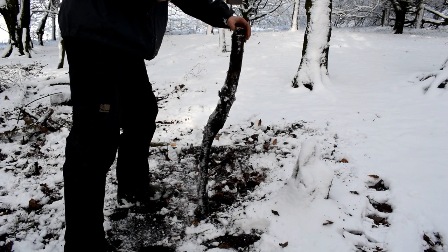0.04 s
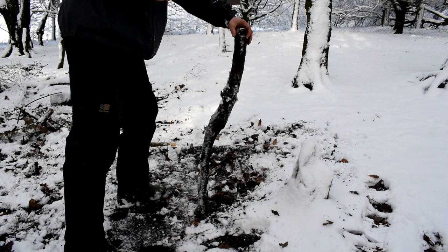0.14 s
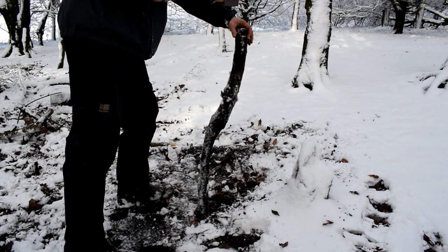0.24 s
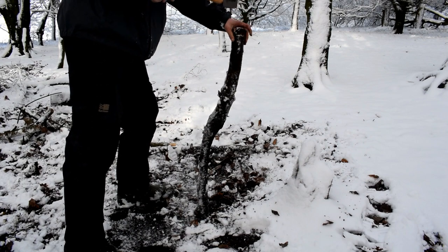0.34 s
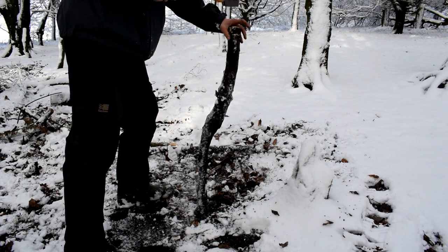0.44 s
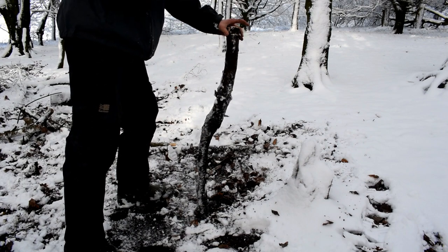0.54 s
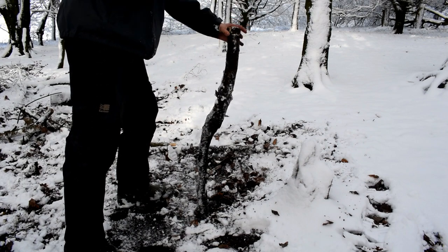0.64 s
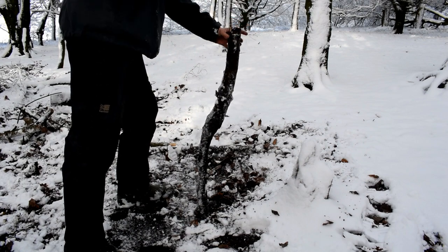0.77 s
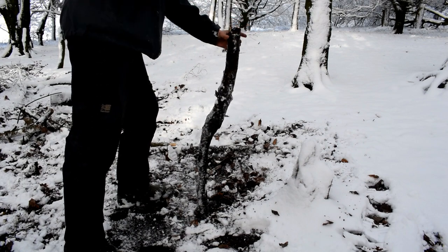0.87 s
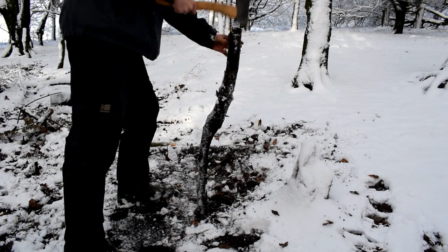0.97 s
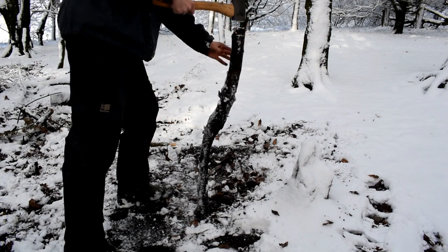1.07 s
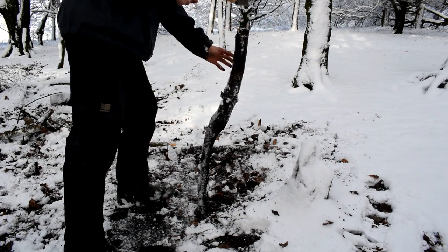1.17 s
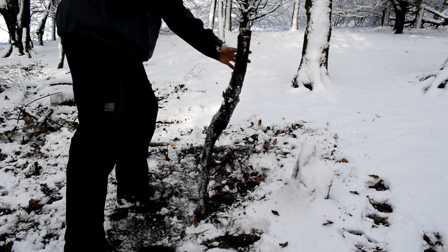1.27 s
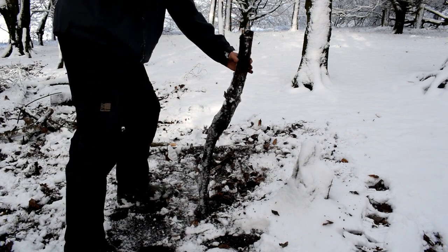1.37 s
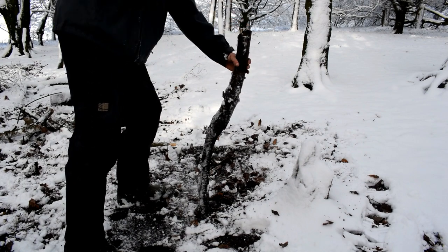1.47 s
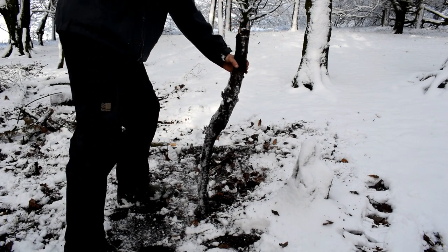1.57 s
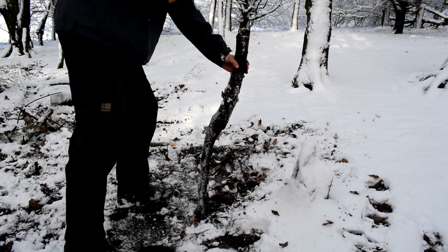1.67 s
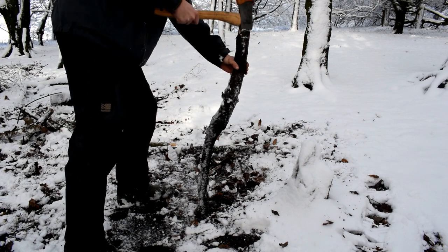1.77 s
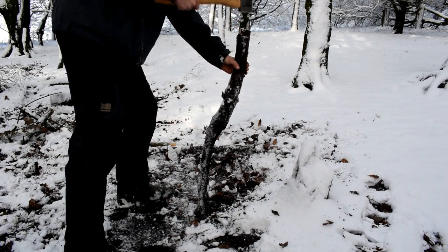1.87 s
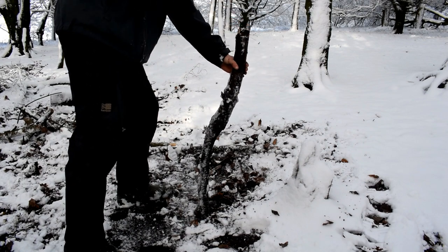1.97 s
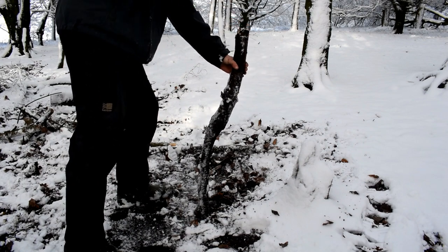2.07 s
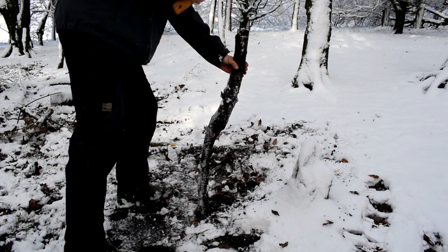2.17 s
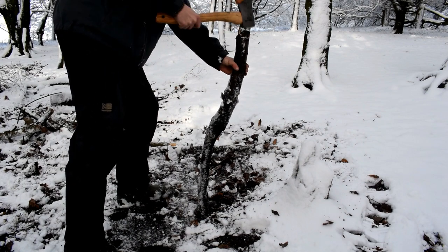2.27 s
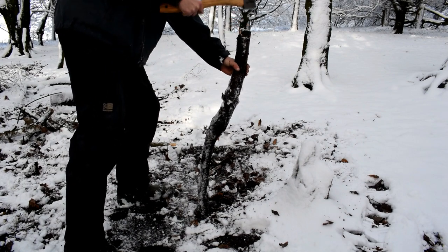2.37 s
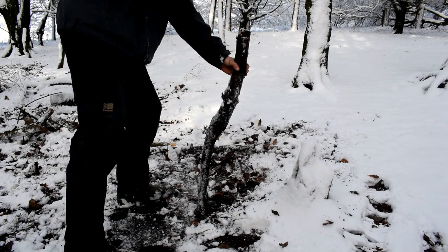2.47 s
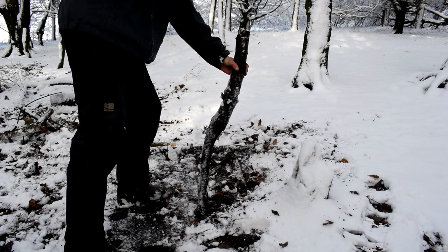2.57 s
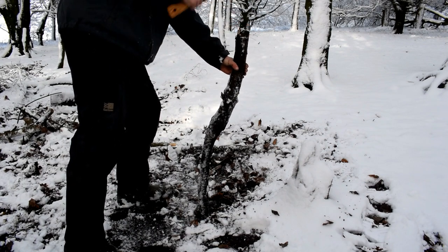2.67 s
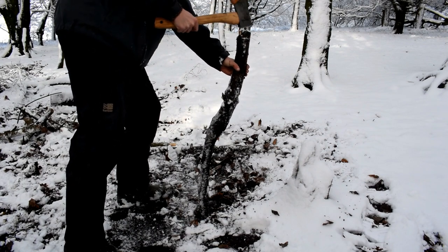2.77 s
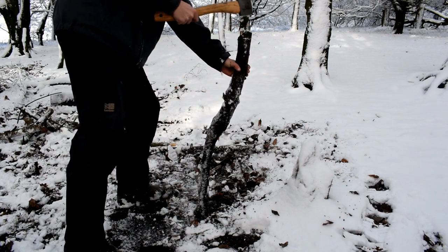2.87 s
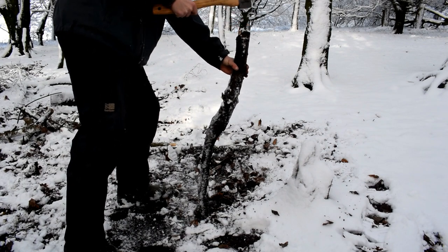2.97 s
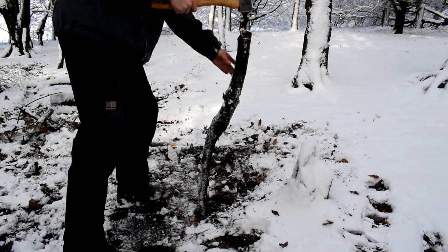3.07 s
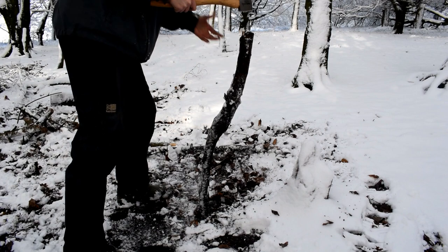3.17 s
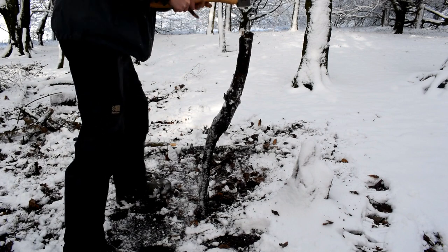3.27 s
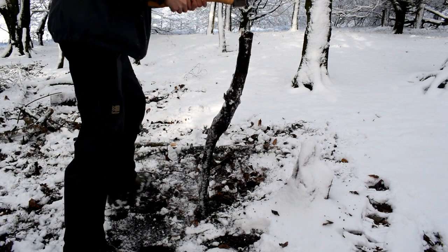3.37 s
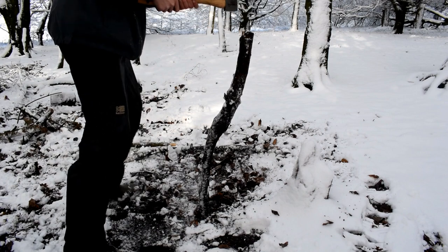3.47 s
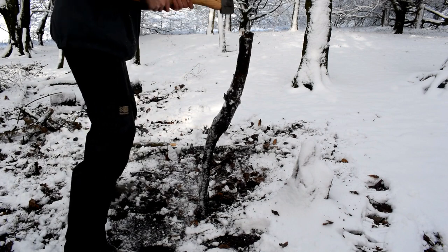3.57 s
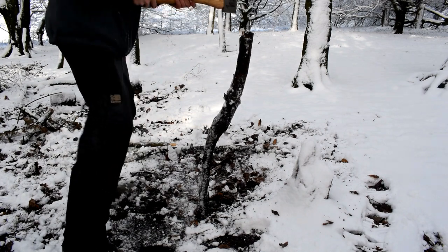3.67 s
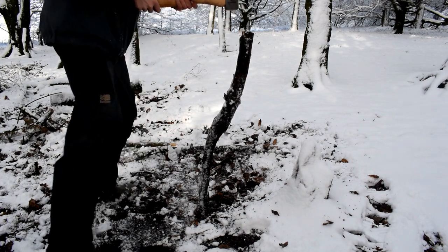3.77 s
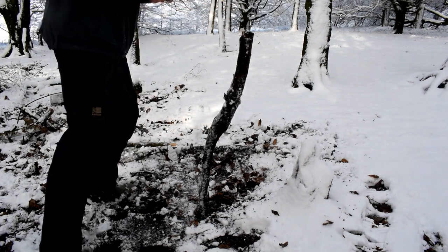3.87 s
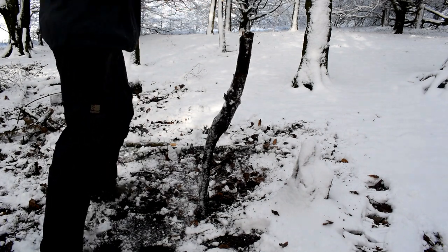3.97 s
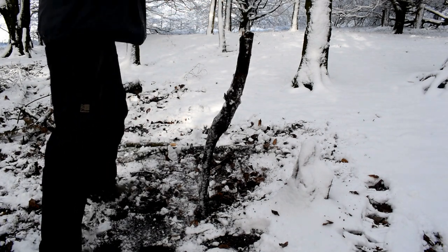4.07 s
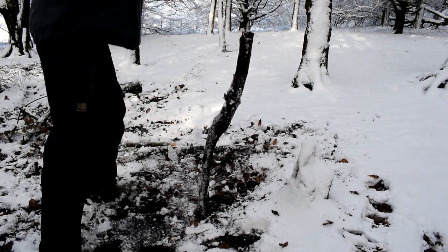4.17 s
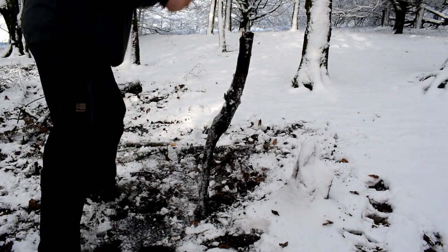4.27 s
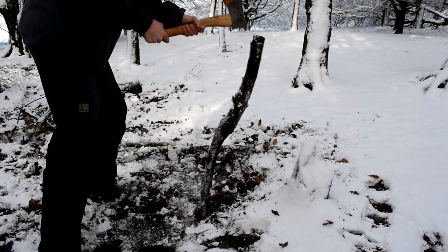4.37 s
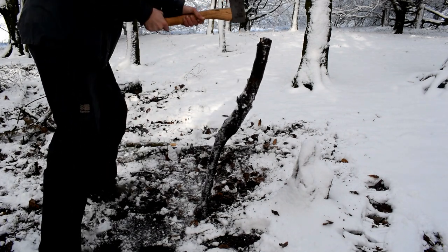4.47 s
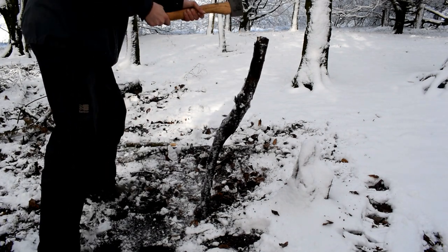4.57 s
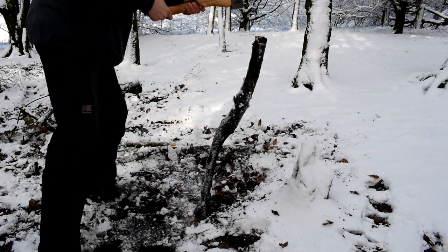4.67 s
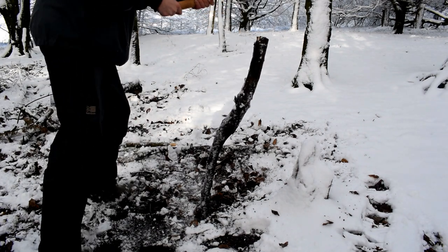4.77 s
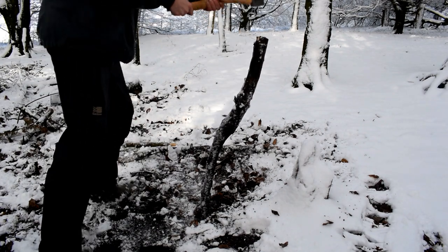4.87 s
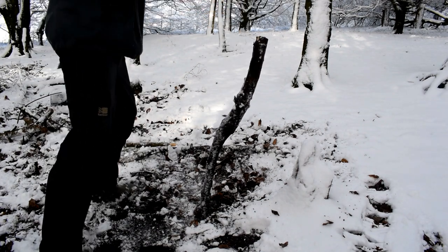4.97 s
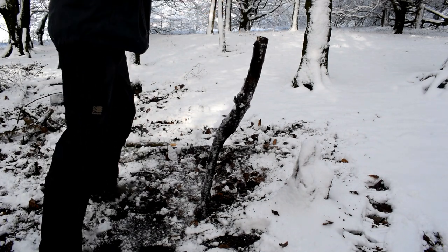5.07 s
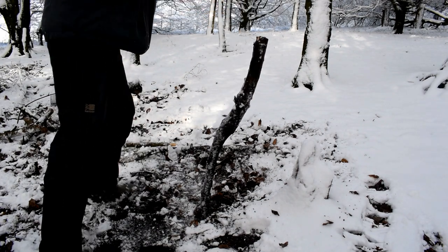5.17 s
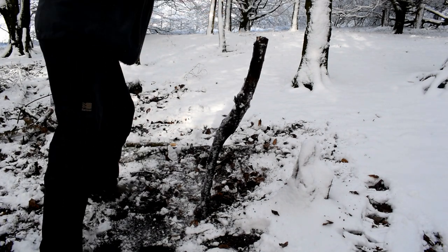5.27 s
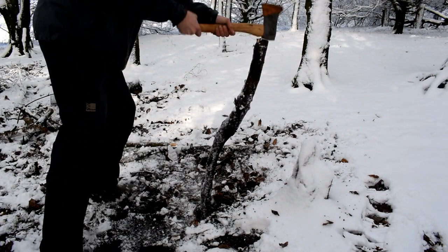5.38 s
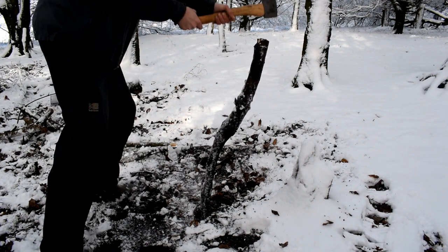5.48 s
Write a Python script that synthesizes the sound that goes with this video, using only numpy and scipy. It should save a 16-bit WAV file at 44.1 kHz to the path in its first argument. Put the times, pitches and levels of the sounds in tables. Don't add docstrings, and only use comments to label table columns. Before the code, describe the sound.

Uneven, hard woody knocks ring out in quiet winter woodland, overloading the microphone, between rustling cloth and later footsteps in snow.

```python
import sys
import numpy as np
from scipy import signal
from scipy.fft import rfft, irfft
from scipy.io import wavfile

SR = 44100
rng = np.random.default_rng(int(sys.argv[2]) if len(sys.argv) > 2 else 0)


def put_to_file(sound):
    columns = np.atleast_2d(sound).T
    safe = np.clip(columns, -1, 1)
    whole_steps = np.round(safe * 32767)
    wavfile.write(sys.argv[1], SR, whole_steps.astype(np.int16))


def boost_factor(decibels):
    exponent = np.asarray(decibels, float) / 20
    return 10 ** exponent


N = 243873


def rms_one(x):
    return x / np.sqrt(np.mean(x ** 2) + 1e-20)


def coloured(x, spectrum):
    hz, db = np.transpose(spectrum)
    bins_hz = np.maximum(np.fft.rfftfreq(len(x), 1 / SR), 1)
    gain_db = np.interp(np.log(bins_hz), np.log(hz), db)
    return irfft(rfft(x) * boost_factor(gain_db), len(x))


def drift(rate_hz):
    knots = rng.standard_normal(int(N / SR * 60) + 3)
    position = np.arange(N) / SR * np.clip(rate_hz, .1, 59)
    return np.interp(position, np.arange(len(knots)), knots) * 1.22


def ring(clicks, hz, t60_s):
    r = boost_factor(-60 / (t60_s * SR))
    w = 2 * np.pi * hz / SR
    return signal.lfilter([0, np.sin(w)], [1, -2 * r * np.cos(w), r * r], clicks + 1e-18)


def burst(t60_s, low_hz, high_hz, size=2000):
    noise = rng.standard_normal(size) * boost_factor(-60 * np.arange(size) / SR / t60_s)
    band_hz = [low_hz, min(high_hz, .45 * SR)]
    return signal.sosfilt(signal.butter(2, band_hz, "band", fs=SR, output="sos"), noise)


def add(track, s, sound):
    at = round(s * SR)
    track[at:at + len(sound)] += sound[:N - at]


def air():
    # (frequency [Hz], density [dB per Hz])
    air_spectrum = [(12, -70), (20, -17.5), (70, -0.5), (169, -10.5), (302, -13.5), (387, -14), (497, -15),
                    (796, -14), (865, -13.5), (1880, -25), (9900, -39.5), (15000, -58)]
    level_db = -51.5 - 0.5 + 0.4 * drift(1.0)
    return boost_factor(level_db) * rms_one(coloured(rng.standard_normal(N), air_spectrum))


def movement_db():
    # (start [s], hold [s], level [dB])
    moves = [(0.529, 0.22, -54.5), (0.914, 0.096, -51), (1.104, 0.069, -56.5), (1.274, 0.13, -55.5),
             (1.46, 0.064, -57.5), (1.696, .12, -51), (1.87, 0.24, -56.5), (2.205, 0.11, -51),
             (2.418, .08, -56), (2.705, 0.093, -50), (2.84, 0.019, -52.5), (2.977, 0.033, -57),
             (3.157, 0.24, -53), (3.492, 0.0082, -44), (3.613, 0.15, -50.5), (3.812, 0.079, -44.5),
             (3.948, .17, -46.5), (4.282, .09, -49.5), (4.348, 0.034, -43.5), (4.569, .08, -55),
             (4.78, 0.22, -59), (5.097, 0.13, -47), (5.324, .1, -49.5), (5.436, 0.063, -56)]
    rise_db_per_s, fall_db_per_s, still_db = 160.5, 199.5, -72
    t, power = np.arange(0, N, 32) / SR, boost_factor(2 * still_db)
    for s, hold_s, db in moves:
        away_db = rise_db_per_s * np.maximum(s - t, 0) + fall_db_per_s * np.maximum(t - s - hold_s, 0)
        power = power + boost_factor(2 * (db - away_db))
    return np.interp(np.arange(N) / SR, t, 10 * np.log10(power))


def jacket():
    # (frequency [Hz], density [dB per Hz])
    swish_spectrum = [(880, -18.5), (1500, -9), (2300, -1.5), (2590, -2), (2940, -1), (5120, -2.5),
                      (8000, -4), (11500, -11), (14500, -28), (16000, -29.5)]
    # (frequency [Hz], density [dB per Hz])
    rustle_spectrum = [(150, -16), (400, -3), (900, -4.5), (1800, -5.5), (2800, -14), (5000, -26.5)]
    swish_db = movement_db()
    grains = rng.standard_normal((2, N)) * boost_factor(2.6 * rng.standard_normal((2, N)))
    swish = rms_one(coloured(grains[0], swish_spectrum)) * boost_factor(swish_db + 1.2 * drift(32))
    sheen = signal.sosfilt(signal.butter(2, 10740, "high", fs=SR, output="sos"), swish)
    swish = swish + sheen * boost_factor(-1.5 + .6 * (swish_db + 54.5))
    rustle_db = -55.5 + .7 * (swish_db + 56)
    rustle = rms_one(coloured(grains[1], rustle_spectrum)) * boost_factor(rustle_db + 0.93 * drift(28))
    return swish + rustle


def chips():
    # (time [s], peak [dB], pitch [Hz], t60 [s])
    ticks = [(.544, -41, 6000, 0.008), (0.781, -36, 1430, 0.0096), (0.798, -37.5, 1180, 0.012),
             (2.1056, -29.5, 8500, 0.005), (2.836, -50, 7000, .005), (2.903, -33.5, 4970, 0.0057),
             (2.906, -30, 1200, 0.01), (3.42, -34, 8000, 0.0066), (3.819, -34, 1500, .008),
             (4.3958, -14.5, 4120, 0.0045), (4.447, -49, 8000, .005), (4.5527, -25, 9400, 0.0057),
             (4.554, -34.5, 5200, 0.021)]
    out = np.zeros(N)
    for s, peak_db, hz, t60_s in ticks:
        span = 0.88 + 0.0039 / t60_s
        snap = burst(t60_s, low_hz=hz / span, high_hz=hz * span)
        add(out, s, boost_factor(peak_db + 1.5) * snap / np.abs(snap).max())
    return out


def knock(low_db, upper_db, crack_db, ring_share):
    # (frequency [Hz], level [dB], t60 [s])
    stake = [(109, -19.5, 0.14), (194.3, -19.5, 0.062), (300, -12, 0.096), (479.5, -6, 0.074),
             (643.5, -11, 0.072), (809, 2, 0.031), (964, -2, 0.023), (1128, -2.5, 0.025),
             (1300, 1.5, 0.015), (1452, 0, 0.021), (1674, -3, 0.025), (1801, -1.5, 0.027),
             (2167, -0.5, 0.0085), (2638, -9.5, 0.019), (3034, -7, 0.016), (4020, -28.5, 0.021),
             (5200, -27.5, 0.029)]
    # (delay [s], level [dB])
    rebounds = [
        (.0012, -2),
        (.0037, -1.5),
        (.0074, -10),
    ]
    contacts = [(0.00041, -5)] + rebounds
    sound = np.zeros(8000)
    loudest_db = max(mode[1] for mode in stake)
    for hz, level_db, t60_s in stake:
        group_db = low_db if 250 < hz < 700 else upper_db if hz > 1050 else 0
        strengths, signs = rng.normal(0, 1, (2, 4))
        clicks = np.zeros(8000)
        for (s, db), strength, sign in zip(contacts, strengths, signs):
            polarity = 1 if sign < .2 or level_db == loudest_db else -1
            clicks[round(s * SR)] = boost_factor(db + 2 * strength) * polarity
        sound += boost_factor(level_db + group_db) * ring(clicks, hz, t60_s * ring_share)
    sound = signal.sosfilt(signal.butter(3, [170., 8000.], "band", fs=SR, output="sos"), sound)
    sound[18:2018] += boost_factor(crack_db) * burst(t60_s=0.021, low_hz=2440, high_hz=10500)
    return sound


def slap(band_db):
    # (frequency [Hz], t60 [s])
    clap = [(650, 0.0034), (1120, 0.0056), (1700, 0.0053), (2700, 0.0024)]
    click = np.arange(1000) == 0
    return sum(boost_factor(db) * ring(click, hz, t60_s) for db, (hz, t60_s) in zip(band_db, clap))


def woodland():
    # (delay [s], level [dB])
    echoes = [
        (0.0131, 2.5),
        (.0270, -21.5),
        (0.0314, -24),
    ]
    # (frequency [Hz], level [dB])
    trunks = [(100, -7), (300, -18.5), (600, -2), (1000, -3), (1800, -1), (2400, -7.5), (3300, -8),
              (3800, -16.5), (7000, -20.5), (12000, -42.5)]
    # (delay [s], spread [s], level [dB])
    stands = [(.045, 0.0072, 0.5), (0.062, 0.011, -3.5), (0.073, 0.0036, 3), (0.091, 0.0041, 3),
              (0.127, 0.0031, 0), (.185, 0.004, -6)]
    near_t60_s, far_t60_s, near_db, far_db = 0.064, 0.63, -3, -33.5
    t = np.arange(40000) / SR
    hit = rng.random(len(t)) < .15
    scatter = rms_one(rng.standard_normal(len(t)) * hit) * np.clip((t - .012) / 0.016, 0, 1)
    scatter *= boost_factor(near_db - 7.5 - 60 * t / near_t60_s) + boost_factor(far_db - 4.5 - 60 * t / far_t60_s)
    scatter *= boost_factor(sum(db * np.exp(-.5 * ((t - s) / spread_s) ** 2) for s, spread_s, db in stands))
    returns = np.zeros(len(t))
    for s, db in echoes:
        returns[round(s * SR)] = boost_factor(db)
    return coloured(returns, trunks), coloured(scatter, trunks)


def hatchet():
    # (time [s], peak [dB], low modes [dB], upper modes [dB], crack [dB])
    knocks = [
        (1.0303, -2.5, -8.5, 0.5, -36),
        (1.809, 2, -12, 0, -16.5),
        (2.2875, 9, -9.5, -7, -25),
        (2.7807, 4.5, -7.5, -3.5, -55),
        (4.3530, 8.5, -4, -4, -11),
        (5.4040, 7.5, -3, 1, -14),
    ]
    # (single returns [dB], then each clap band [dB])
    wood_returns = [(1, -22, -13, -0.5, -19), (-1.5, -9, 1.5, -1.5, -19.5), (-5, -8, 5, -14.5, -7.5),
                    (-9, -3, 0, -5, -6.5), (-4, -5, 2.5, 2.5, -2), (-1.5, -18, 4, -0.5, 8)]
    out = np.zeros(N)
    returns, scatter = woodland()
    t = np.arange(8000) / SR
    for (s, peak_db, *colour), (returns_db, *band_db) in zip(knocks, wood_returns):
        ring_share = np.clip(0.84 - 0.061 * s, .3, 1)
        sound = boost_factor(peak_db - 2.0) * knock(*colour, ring_share)
        add(out, s, sound)
        add(out, s, boost_factor(returns_db) * signal.fftconvolve(sound * boost_factor(-60 * t / 0.016), returns))
        add(out, s, signal.fftconvolve(slap(band_db), scatter))
    return out


def boots():
    # (time [s], level [dB])
    shuffle = [(2.95, -51), (3.488, -48), (3.68, -51), (4.33, -56)]
    # (time [s], peak [dB], pitch [Hz], t60 [s], grit [dB])
    steps = [(3.310, -25, 370, 0.019, -4), (3.365, -32, 680, 0.0049, -1.5), (3.397, -40, 805, 0.0088, 3),
             (3.549, -38, 300, 0.011, -10), (3.572, -28.5, 354, 0.0068, -16), (3.696, -38, 400, 0.0059, 0),
             (3.729, -31.5, 1140, 0.0099, -21), (3.817, -37, 1300, 0.016, 0),
             (3.884, -28.5, 373, 0.029, 1.5), (3.895, -28.5, 248, 0.0067, -15),
             (3.912, -27.5, 360, 0.0088, -16), (3.922, -27.5, 340, 0.016, -23),
             (4.059, -45, 1510, 0.0063, 7), (4.122, -43, 500, 0.01, -26), (4.165, -41, 360, 0.016, -10),
             (4.289, -35, 500, 0.0084, -12), (4.303, -25.5, 221, 0.013, -12.5),
             (5.327, -30, 375, 0.018, -13)]
    s, level_db = np.transpose(shuffle)
    shuffle_db = np.interp(np.arange(N) / SR, s, level_db, -90, -90)
    rumble = rms_one(coloured(rng.standard_normal(N), [(60, -12.0), (130, 2.0), (350, 4.5), (700, -27.0)]))
    out = rumble * boost_factor(shuffle_db - 8.5 + 2.3 * drift(31))
    for s, peak_db, hz, t60_s, grit_db in steps:
        crush = burst(t60_s=0.037, low_hz=78.5, high_hz=3020)
        crush[0] += 6.0
        thud = ring(crush, hz, t60_s)
        thud = thud + 1.1 * ring(crush, 1.65 * hz, 0.38 * t60_s)
        thud = thud + 0.88 * ring(crush, 0.47 * hz, 1.1 * t60_s)
        grit = boost_factor(grit_db) * 3.0 * burst(t60_s=0.015, low_hz=614, high_hz=1640)
        add(out, s + 0.00105, boost_factor(peak_db + 2.5) * (thud / np.abs(thud).max() + grit))
    return out


def scene():
    return (air() + jacket() + chips() + hatchet() + boots())[None]


def top_cut(x):
    return signal.sosfilt(signal.butter(12, 16290, fs=SR, output="sos"), x)


def record(dry):
    clipped = .99 * dry / (1 + np.abs(dry) ** 16) ** (1 / 16)
    cut = signal.sosfilt(signal.cheby2(10, 30, 15900, fs=SR, output="sos"), clipped)
    return top_cut(cut)


dry = scene()
out = record(dry)
put_to_file(out)
```